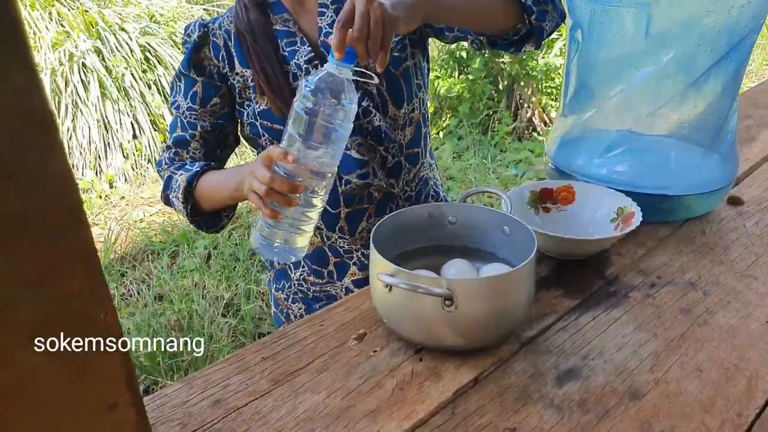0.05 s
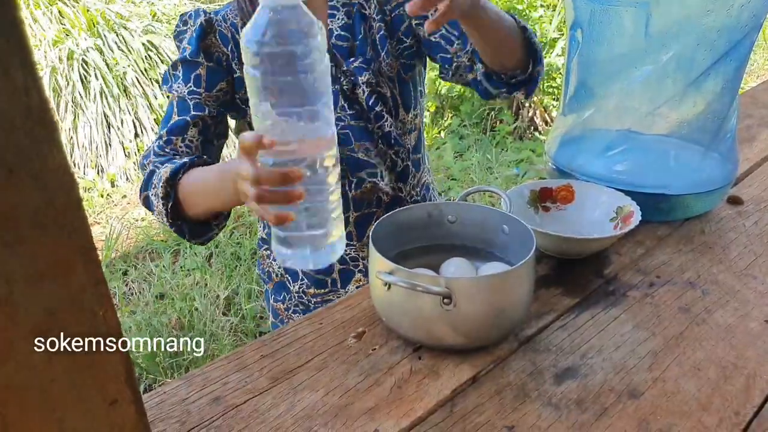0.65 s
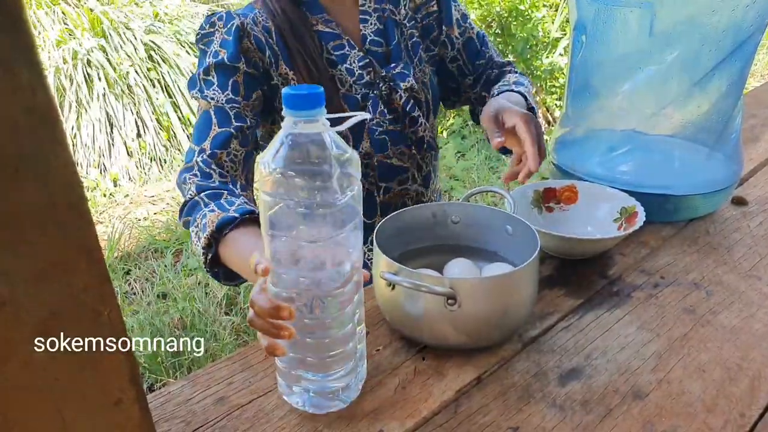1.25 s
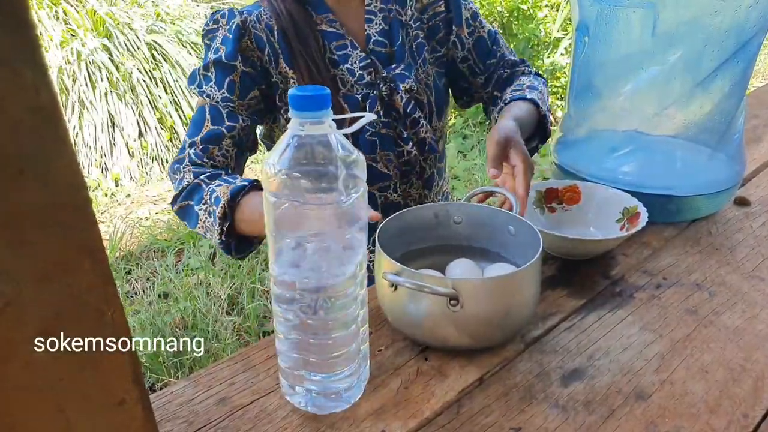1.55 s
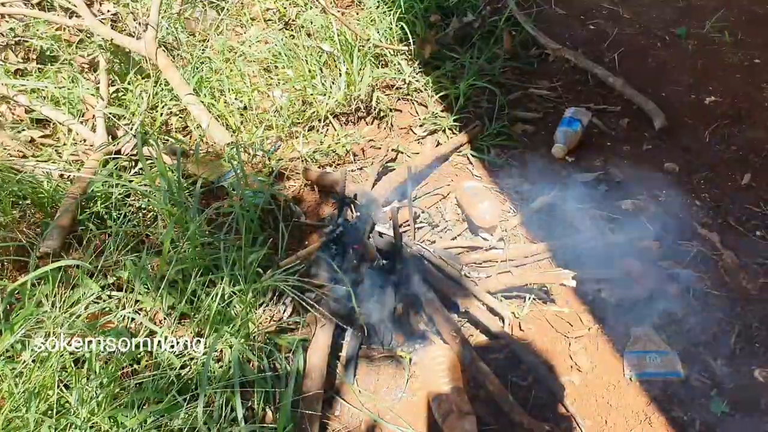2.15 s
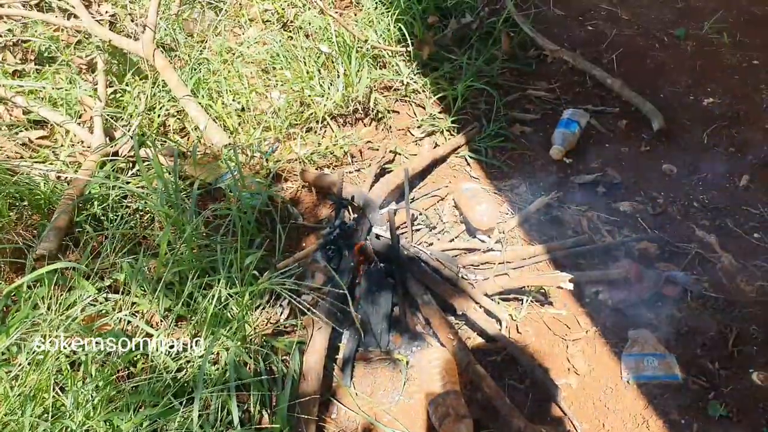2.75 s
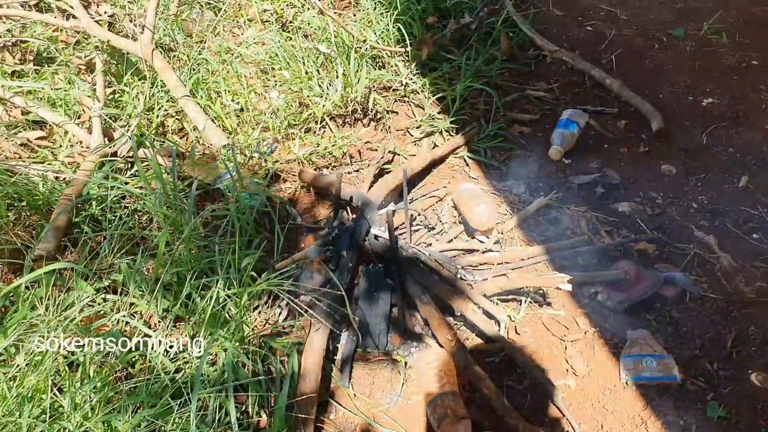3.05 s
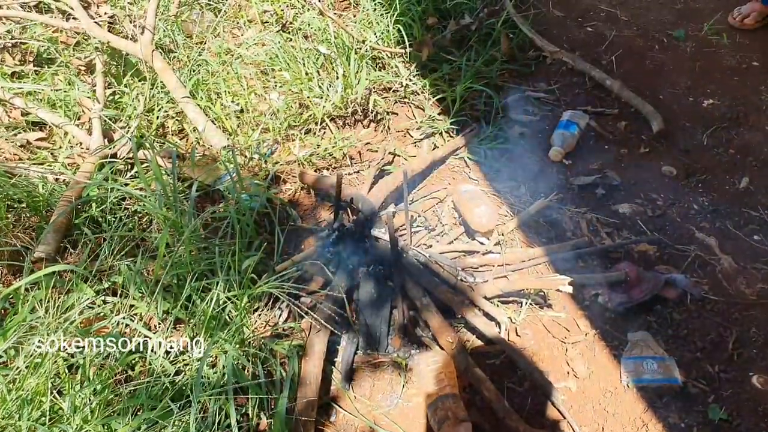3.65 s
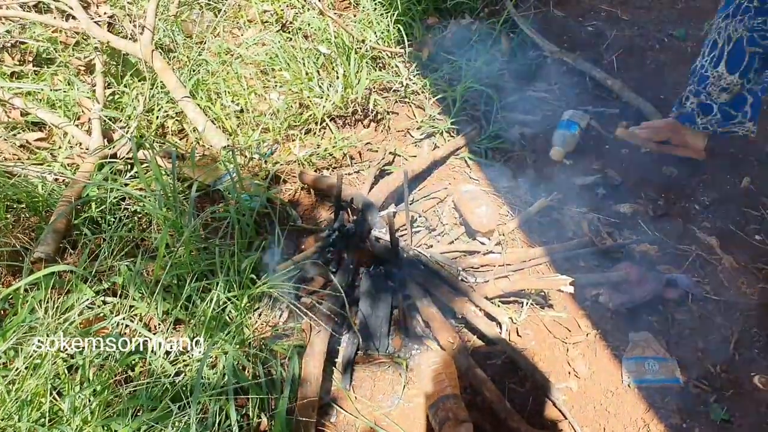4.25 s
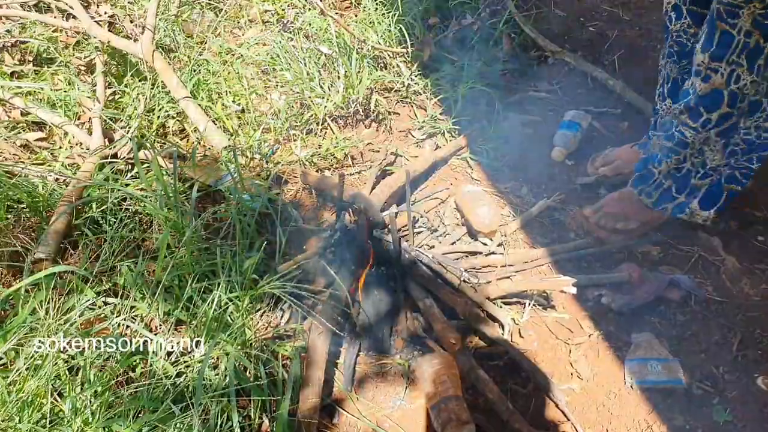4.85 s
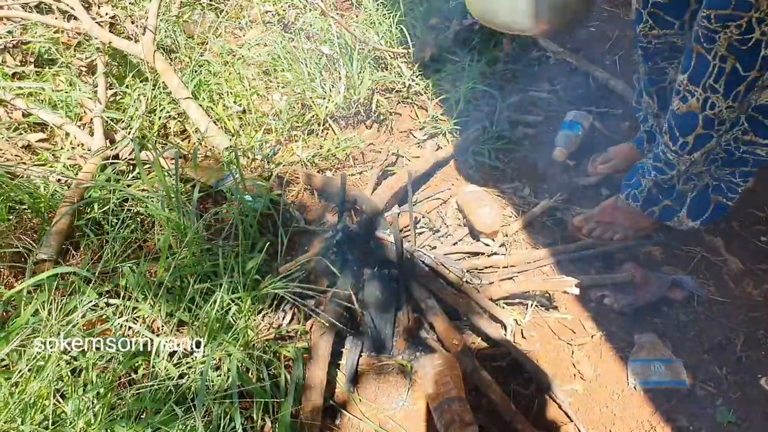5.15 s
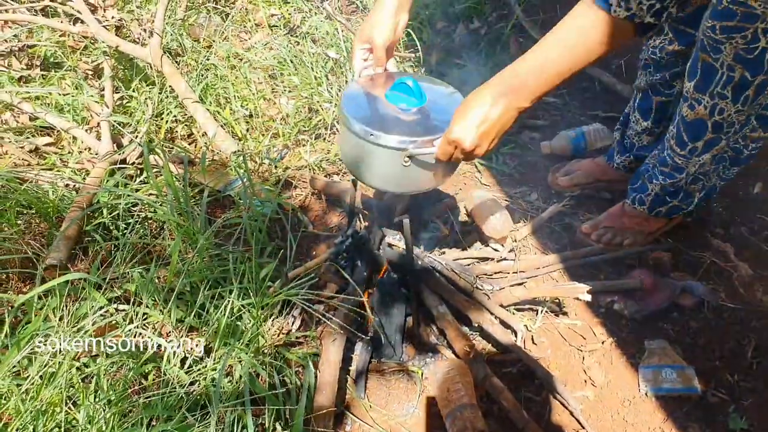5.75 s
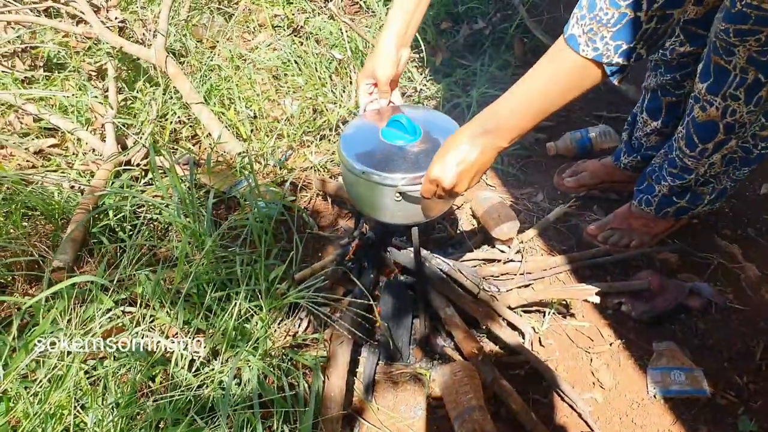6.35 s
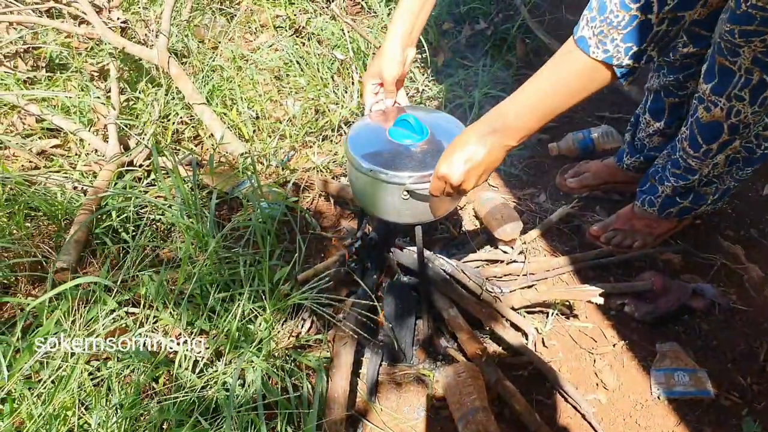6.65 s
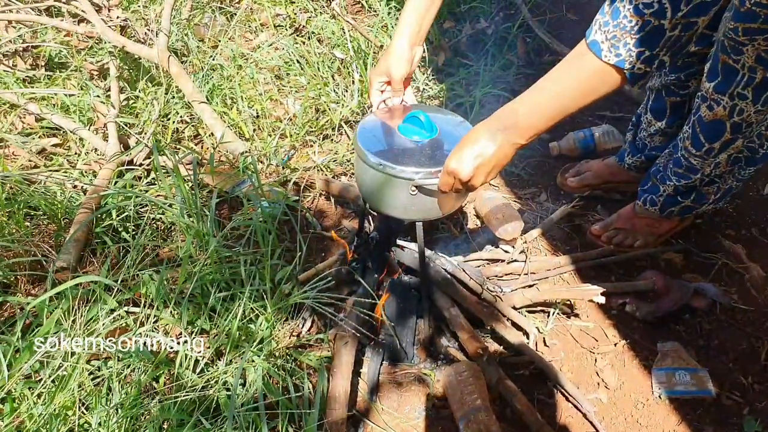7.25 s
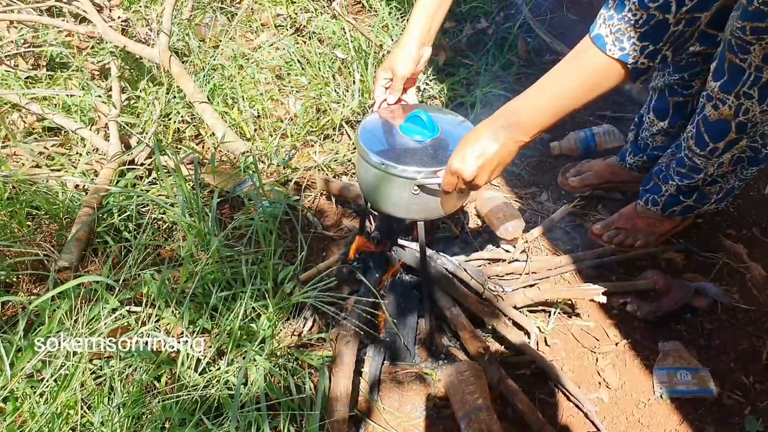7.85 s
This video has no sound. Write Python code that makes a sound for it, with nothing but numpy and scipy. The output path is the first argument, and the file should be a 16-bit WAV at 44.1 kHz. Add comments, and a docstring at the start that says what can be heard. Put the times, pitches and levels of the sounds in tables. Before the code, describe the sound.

Wind buffets the microphone as a full plastic water bottle lands on a plank table with a thud, a low boom and a slosh. A metal pot is lifted with a rasp, its loose lid rattling as it is carried. The wind dies away, and bare feet thump on earth, crushing dry leaves and snapping twigs. The pot clanks down over a small wood fire that pops and ticks, with soft rustling of cloth and grass.

```python
"""Wind buffets the microphone as a water bottle lands on a plank table with a thud, a boom and a slosh.
A metal pot is lifted with a rasp and carried to a small wood fire: bare feet thump on earth, crush
dry leaves and snap twigs, while the loose lid rattles and rings the pot, clanking hardest as it is
settled over the flames. The breeze dies down at the fire, which pops and ticks. Cloth and grass
rustle, a distant bird whistles once, and a nearby shelter adds a faint, short reverb."""
import sys
import numpy as np
from scipy import signal
from scipy.fft import rfft, irfft, next_fast_len
from scipy.io import wavfile
from scipy.ndimage import map_coordinates

SR = 44100
rng = np.random.default_rng(int(sys.argv[2]) if len(sys.argv) > 2 else 0)


def unload_wav(signal):
    """Save mono or channel-first audio to the path in sys.argv[1] as 16-bit WAV at rate SR, clipped to [-1, 1]."""
    wavfile.write(
        sys.argv[1],
        SR,
        np.round(np.clip(np.atleast_2d(signal).T, -1, 1) * 32767).astype(np.int16),
    )


N = 351918
TIME = np.arange(N) / SR
AGE = np.arange(SR // 3) / SR  # time since a hit [s]
TOP_HZ = 16400  # band limit
SNAP_LEAD_S = .00145  # room ahead of a snap's attack

# how much the cook stirs cloth and grass: (time [s], level [dB])
RUSTLE = [(0, -59.5), (1.8, -61), (2.25, -54), (2.6, -70), (3.8, -66), (4.29, -61.5), (4.7, -49.5),
          (5.3, -54.5), (5.62, -48.5), (5.75, -61), (6.03, -66.5), (7.98, -64)]


def lid(rim_db=-13, mode_spread_db=4.5, bounce_s=.009, bounce_db=-4, graze_s=.012, graze_db=-16.5):
    """The lid grazes, lands and rocks onto its other edge, ringing the pot anew at each contact."""
    # lid against pot: (time [s], level [dB], 2 kHz ring favoured by the point of contact [dB])
    contacts = [(2.024, -11.5, -2.5), (2.131, -22, -2), (2.286, -31, -1), (2.449, -33.5, -0.5),
                (2.546, -31.5, -5), (2.619, -34, 1), (2.714, -29.5, 3), (2.872, -28, -1.5),
                (2.96, -33.5, 9), (3.259, -30, 1), (3.439, -30.5, 3), (3.532, -21.5, 1.5), (3.652, -33, 0),
                (3.966, -28, 1), (4.039, -33, -4), (4.087, -34, -4), (4.205, -24, 1.5), (4.412, -31, -5),
                (4.517, -22.5, -3), (5.39, -28.5, 4), (5.817, -23.5, -0.5), (6.422, -8, 4),
                (6.84, -37.5, -3), (7.085, -19.5, -1), (7.314, -21.5, 1), (7.424, -36, -5)]
    # modes of pot and lid: (frequency [Hz], level [dB], t60 [s])
    pot_modes = [(325, -9, .1), (455, -13, .09), (540, -11, .1), (690, -9, .08), (994, -10, .07),
                 (1120, -15, .08), (1252, 1, .15), (1563, -3, .07), (1908, -2, .07), (2004, -2.5, .12),
                 (2072, -17, .24), (2191, -18, .12), (2589, -15, .13), (2678, -13.5, .15), (3425, -6, .13),
                 (3705, -20, .14), (4480, -27, .12), (6702, -27, .11), (7294, -24, .08)]
    # the rim's dense, short clatter: (frequency [Hz], level [dB])
    rim_spectrum = [(100, -17), (230, -8.5), (320, -3.5), (600, -10), (760, -4.5), (1100, -1), (2050, -5),
                    (2450, -9), (3500, -12.5), (5000, -22.5), (7200, -15), (9000, -25), (16000, -26.5)]

    def clatter():
        """One burst of rim noise."""
        return coloured(scatter(width=.57), rim_spectrum) * dying(t60=.077, rise=.00022)

    out = np.zeros((2, N))
    hz, mode_db, t60 = np.transpose(pot_modes)
    modes = np.exp(2j * np.pi * hz[:, None] * AGE) * dying(t60[:, None], rise=.0029)
    second_edge = 1 + amp(bounce_db) * np.clip((AGE - bounce_s) / .00067, 0, 1)
    for s, db, pitch_db in contacts:
        force_db = db + 25.5  # relative to a middling contact
        # each ear sees the shell's lobes from its own angle
        phase = rng.uniform(0, 2 * np.pi, len(hz)) + rng.normal(0, .25, (2, len(hz)))
        strengths = amp(mode_db + rng.normal(0, mode_spread_db, len(hz)))
        ring = ((strengths * np.exp(1j * phase)) @ modes).real * second_edge
        rim = clatter() + amp(bounce_db) * np.roll(clatter(), int(bounce_s * SR), axis=1)
        # a soft landing thuds; a hard one is bright and rings more
        thud_db = 3.5 - .27 * force_db
        bright_db = -8.5 + .29 * force_db - pitch_db / 2
        ring_db = -10 + .1163 * force_db
        touch = [(170, -11), (300, thud_db), (500, thud_db), (700, -pitch_db),
                 (950, 3), (1250, -.5), (2000, pitch_db), (3400, bright_db)]
        clank = amp(ring_db) * unit_hit(ring) + amp(rim_db) * unit_hit(rim)
        place(out, s, amp(db) * coloured(clank, touch))
        # a fast lid lands sooner after its graze
        lead_s = graze_s * amp(-.85 * max(force_db, 0))
        place(out, s - lead_s, amp(db + rim_db + graze_db) * unit_hit(clatter()))
    return out


def knocks():
    """The full bottle and the pot thud and tap, the water washes, and the planks boom under the bottle."""
    # heavy, water-filled things meeting a support: (time [s], level [dB], t60 [s])
    thuds = [(.683, -34, 0.12), (1.277, -31, 0.1), (1.352, -24.5, 0.12), (1.387, -32.5, 0.37),
             (6.423, -23.5, .045), (6.456, -34.5, 0.065)]
    # taps on bottle and pot, and the wash of water in the bottle:
    # (time [s], level [dB], centre [Hz], t60 [s])
    taps_and_wash = [(.295, -49, 2030, 0.16), (0.651, -48.5, 2500, 0.12), (.717, -37.5, 2260, 0.035),
                     (0.795, -43.5, 970, 0.079), (1.273, -26.5, 1170, 0.074), (1.371, -35, 2110, 0.3),
                     (1.632, -36, 1950, .15), (7.387, -52, 2980, 0.017)]
    out = np.zeros((2, N))
    for s, db, t60 in thuds:
        place(out, s, knock(db, hz=467, octaves=.36, rise=.0027, t60=t60))
    for s, db, hz, t60 in taps_and_wash:
        place(out, s, knock(db, hz, octaves=.61, rise=.01 * t60, t60=t60))
    plank_boom = knock(db=-23.5, hz=153, octaves=.12, rise=.048, t60=.98)
    place(out, 1.282, plank_boom)
    return out


def knock(db, hz, octaves, rise, t60, skirt_db=-32):
    """One damped, broad resonance: a decaying band of noise over a faint low skirt."""
    def resonance(f):
        hump = np.exp(-(np.log2((f + 1) / hz) / octaves) ** 2 / 2)
        return hump + amp(skirt_db) / (1 + (f / (2 * hz)) ** 2)

    return amp(db) * unit_hit(filtered(scatter(width=.49), resonance) * dying(t60, rise))


def slosh(start_s=1.37, settle_s=.057, db=-33, hz=2500, spread=.25, decay_cycles=14, count=60):
    """Water in the landed bottle slaps up and settles in a thinning burst of small bubbles."""
    bubbles = np.zeros(len(AGE))
    for when, tuning, size in rng.random((count, 3)):
        delay = -settle_s * np.log(1 - when)
        age = np.maximum(AGE - delay, 0)
        pitch = hz * (1 + spread * (2 * tuning - 1))
        strength = size * np.exp(-delay / (2 * settle_s))
        bubbles += strength * np.sin(2 * np.pi * pitch * age) * np.exp(-age * pitch / decay_cycles)
    out = np.zeros((2, N))
    place(out, start_s, amp(db) * unit_hit(bubbles))
    return out


def steps(dirt_db=-6):
    """Each footfall is a short, hollow thump with a puff of dirt."""
    # bare feet on packed earth: (time [s], level [dB], pitch [Hz], t60 [s])
    footfalls = [(4.616, -39, 334, 0.034), (4.722, -40.5, 268, 0.035), (4.781, -36.5, 272, 0.062),
                 (4.846, -27, 268, 0.085), (5.044, -31, 300, 0.024), (5.086, -36.5, 455, 0.022),
                 (5.412, -34.5, 564, 0.078), (5.515, -39.5, 570, 0.071), (5.545, -44.5, 532, 0.16)]
    dirt_spectrum = [(170, -33), (280, -3), (700, 0), (2000, -20.5), (6000, -42)]
    out = np.zeros((2, N))
    for s, db, hz, t60 in footfalls:
        thump = np.sin(2 * np.pi * hz * AGE) * dying(t60, rise=.0035)
        dirt = coloured(scatter(width=.15), dirt_spectrum) * dying(t60=.058, rise=.001)
        place(out, s, amp(db) * (unit_hit(thump) + amp(dirt_db) * unit_hit(dirt)))
    return out


def crunches(scrape_db=-5, lead_s=.1, crack_s=.0003, count=800, rise_share=.74):
    """Each short crunch is a swarm of tiny pitched cracks over a scrape, swelling and dying."""
    # a rasp as the pot is lifted, then dry leaves underfoot:
    # (time of the peak [s], level [dB], fall time [s], low-end weight [dB])
    cues = [(2.042, -30, 0.022, 16.5), (2.89, -46, 0.025, -3), (2.97, -42, 0.027, -9),
            (4.088, -30.5, 0.014, 8), (4.631, -31, 0.023, 8.5), (4.672, -24, .023, -8.5),
            (4.725, -31.5, .04, 4), (4.779, -24.5, 0.018, 10.5), (5.075, -36.5, 0.048, 9),
            (5.421, -27, 0.014, -11), (5.461, -20, 0.02, -12.5), (5.55, -36.5, 0.019, 6)]
    # tone of a crunch: (frequency [Hz], level [dB])
    crunch_spectrum = [(170, -28), (280, 3.5), (650, -2), (880, -3.5), (1850, 5.5), (3100, 7.5),
                       (4200, 0.5), (5800, -1), (7300, -3), (9000, -11), (12500, -2.5), (16000, -15)]
    out = np.zeros((2, N))
    crack_age = AGE[:160]
    for s, db, fall_s, weight_db in cues:
        when, pitch, size = rng.random((3, count, 1))
        cracks = size ** 3 * np.sin(2 * np.pi * TOP_HZ * pitch * crack_age)
        cracks *= np.exp(-crack_age / crack_s)
        positions = (when * len(AGE)).astype(int) + np.arange(len(crack_age))
        grains = np.bincount(positions.ravel(), cracks.ravel())[:len(AGE)]
        # sliding in small jerks makes the scrape gritty
        jerks_db = np.repeat(rng.uniform(-2, 2, len(AGE) // 60 + 1), 60)[:len(AGE)]
        scrape = unit(scatter(width=1) * amp(jerks_db))
        weight_eq = [(900, weight_db), (3200, .69), (5000, .017), (7000, .15), (11000, -3.5)]
        swarm = coloured(unit(grains) + amp(scrape_db) * scrape, crunch_spectrum, weight_eq)
        past_peak = AGE - lead_s
        swell = np.exp(np.minimum(past_peak / (rise_share * fall_s), -past_peak / fall_s))
        place(out, s - lead_s, amp(db) * unit(swarm) * swell)
    return out


def twigs_and_plastic():
    """Twigs break and plastic buckles with a full-bodied snap."""
    # each snap: (time [s], level [dB], body [dB], high for a thick piece)
    breaks = [(0.7174, -34, -19), (1.3964, -24.5, -7), (2.0252, -20, -5), (2.2847, -33, -12),
              (2.8796, -25.5, -11), (2.9636, -28.5, -11), (2.9796, -26, -20), (4.0389, -29, -14),
              (4.0803, -21.5, -20), (4.3987, -33.5, -18), (4.504, -28, -12), (4.6594, -14, -18),
              (4.6689, -7.5, -18.5), (4.7177, -10, -10), (4.8043, -19.5, -5), (4.814, -29, -14),
              (4.8429, -5.5, -7), (5.1185, -27, -10.5), (5.4495, -15.5, -20)]
    out = np.zeros((2, N))
    for s, db, body_db in breaks:
        shrill_db = -3.5 - .53 * body_db  # a thick piece has less bite near 7 kHz
        place(out, s - SNAP_LEAD_S, snap(db, body_db, shrill_db, top_db=-24.5, t60=.0069))
    return out


def fire_pops():
    """Burning wood lets go in thin pops, brighter the stronger they are."""
    # the fire's loud pops: (time [s], level [dB])
    pops = [(2.2167, -41), (2.3302, -33), (2.5695, -37.5), (3.466, -38.5), (4.9988, -35), (5.205, -28.5),
            (5.2846, -34.5), (5.7894, -20.5), (5.902, -26), (5.9262, -29), (5.9356, -16.5), (6.112, -26.5),
            (6.601, -38.5), (6.7623, -32), (6.8842, -25), (7.4437, -35.5), (7.5227, -29), (7.8264, -36)]
    out = np.zeros((2, N))
    for s, db in pops:
        force_db = db + 28.5  # relative to a middling pop
        pop = snap(db, body_db=-23, shrill_db=8.5, top_db=-8.5 + .77 * force_db, t60=.0053)
        place(out, s - SNAP_LEAD_S, pop)
    return out


def snap(db, body_db, shrill_db, top_db, t60, ground_db=-22, crest_db=12):
    """Dry wood lets go in about a millisecond; the ground scatters a short tail."""
    crack = scatter(width=.35) * dying(t60, rise=.0004)
    tail = amp(ground_db) * scatter(width=.8) * dying(t60=.055, rise=.001)
    burst = np.roll(crack + tail, round(SNAP_LEAD_S * SR), axis=1)
    tone = [(170, body_db + 1), (500, body_db + 18), (1000, body_db + 9), (2100, body_db + 19.5),
            (3100, 2.5), (4200, .5), (7000, shrill_db),
            (9000, top_db + 7), (12500, top_db + 14), (16000, top_db + 7.5)]
    return amp(db - crest_db) * unit_hit(coloured(burst, tone))


def embers():
    """Between its loud pops the fire ticks faintly at random."""
    crackle = ticks(per_s=20, level_db=-61.5, spread_db=1)
    return coloured(crackle, [(500, 2.6), (3000, 5.6), (7200, 19.2), (9000, 6.6), (16000, 4.3)])


def litter():
    """Bits of straw and leaf crack underfoot, as hard as the cook stirs."""
    cracks = ticks(per_s=45, level_db=curve(RUSTLE, TIME) + 5, spread_db=6)
    return coloured(cracks, [(300, -5), (1500, -32), (3000, 11), (7200, 5.5), (9000, -6), (16000, 1)])


def ticks(per_s, level_db, spread_db, tick_s=.0009, start_s=2.02):
    """Random millisecond bursts of noise around the fireplace."""
    sizes = amp(level_db + spread_db * rng.uniform(-1, 1, N))
    strikes = (rng.random(N) < per_s / SR) * (TIME > start_s) * sizes
    envelope = signal.lfilter([1], [1, -np.exp(-1 / (tick_s * SR))], strikes)
    return envelope * (rng.standard_normal(N) + .5 * rng.standard_normal((2, N)))


def rustle(flutter_db=2.5, catch_db=.8):
    """Cloth and grass brush unevenly as the cook moves."""
    # single sweeps of a sleeve or a foot: (middle [s], length [s], level [dB])
    sweeps = [(.22, 0.14, -52), (.755, 0.074, -54), (.87, .12, -56), (1.4, 0.11, -51), (1.905, 0.15, -53.5),
              (2.76, 0.09, -56.5), (2.93, 0.17, -55), (4.06, 0.12, -56), (4.41, .1, -49.5),
              (4.72, 0.19, -40), (5.87, 0.13, -46)]
    # tone of the brushing: (frequency [Hz], level [dB])
    brush_spectrum = [(200, -2.5), (400, 8), (1000, 1.5), (2800, 2), (5000, 1), (7400, 1.5), (9000, -10.5),
                      (16000, -12.5)]
    rubbing = np.hypot(amp(curve(RUSTLE, TIME)), swells(sweeps, edge=2.5))
    roughness = amp(flutter_db * wobble(70) + catch_db * wobble(15))
    return rubbing * roughness * rush(brush_spectrum, likeness=[(1000, .027)])


def wind(air_db=-56, eddy_db=15):
    """Gusts buffet each microphone port separately, over the even hiss of the garden."""
    # the breeze, dying down at the fire: (time [s], level [dB])
    breeze = [(0, -48.5), (.38, -52.5), (1.1, -37), (1.25, -37), (1.4, -32.5), (2.25, -35.5), (2.4, -50),
              (3.6, -59.5), (4.2, -78)]
    # gusts on top of it: (middle [s], length [s], level [dB])
    gusts = [(.275, 0.1, -36.5), (.575, 0.28, -26), (.745, 0.024, -28.5), (.91, 0.21, -31.5)]
    # low rumble of the buffeting: (frequency [Hz], level [dB])
    rumble_spectrum = [(20, -11), (45, -0.5), (78, 3), (100, -7), (125, -14.5), (170, -23), (240, -34),
                       (500, -89)]
    # flutter of hard gusts: (frequency [Hz], level [dB])
    eddy_spectrum = [(60, -20), (130, 8), (185, -4), (260, -13), (500, -53)]
    # the garden's hiss: (frequency [Hz], level [dB])
    air_spectrum = [(25, -11.5), (66, 0), (110, -8), (172, -15), (358, -18.5), (550, -19), (850, -22.5),
                    (2700, -24), (5200, -34), (7000, -28), (8830, -47.5), (12500, -39), (15500, -32.5),
                    (16500, -63)]
    # stereo image of that hiss: (frequency [Hz], left-right correlation [0-1])
    air_likeness = [(50, 1), (300, 0.48), (1000, 0), (4000, 0)]
    force = (amp(curve(breeze, TIME)) + swells(gusts, edge=4.5)) * amp(wobble(22))
    rumble = force * rush(rumble_spectrum, likeness=[(60, .1)])
    # small eddies grow with the square of the force: only hard gusts flutter higher up
    eddies = amp(eddy_db) * force ** 2 * rush(eddy_spectrum, likeness=[(60, .074)])
    air = amp(air_db + .33 * wobble(3.53)) * rush(air_spectrum, air_likeness)
    lean_left = amp([[1], [-1]])
    return (rumble + eddies) * lean_left + air


def bird(start_s=1.69, length_s=.24, low_hz=4050, high_hz=4750, db=-67):
    """A distant bird gives one faint, rising whistle."""
    progress = np.clip((TIME - start_s) / length_s, 0, 1)
    pitch = low_hz + (high_hz - low_hz) * progress
    waver = 1 + .012 * wobble(250)
    whistle = np.sin(2 * np.pi * np.cumsum(pitch * waver) / SR)
    return amp(db) * np.sin(np.pi * progress) ** 2 * whistle


def shelter(x):
    """A short reverb from the roof and posts nearby."""
    # decay of the reflections: (frequency [Hz], t60 [s])
    decay_times = [(200, 0.065), (2000, 0.23), (10000, 0.18)]
    hz, t, noise = signal.stft(rng.standard_normal((2, SR // 3)), SR, nperseg=256)
    decay = amp(-60 * t / along(decay_times, hz)[:, None])
    _, tail = signal.istft(noise * decay, SR, nperseg=256)
    tail = np.pad(tail / np.linalg.norm(tail[0]), ((0, 0), (SR // 200, 0)))  # 5 ms pre-delay
    return signal.fftconvolve(x, tail, axes=1)[:, :N]


def place(track, s, sound):
    """Mix a sound in at time s, with the ear delay and balance of the cook's position."""
    # where the cook is: (time [s], delay of the left ear [s], left minus right [dB])
    bearing = [(.7, -.0001, 1.5), (1.7, -.00018, 3), (2.0, .00027, -2), (3.5, .00026, -1),
               (4.8, .00021, -2.5), (5.5, .00014, -1), (6.1, -.00002, 2.2), (7.9, -.00002, 0.5)]
    times, lags, pans = np.transpose(bearing)
    lag_s, pan_db = np.interp(s, times, lags), np.interp(s, times, pans)
    ears = np.array([[.5], [-.5]])
    pair = filtered(sound * amp(ears * pan_db), lambda hz: np.exp(-2j * np.pi * hz * lag_s * ears))
    start = max(round(s * SR), 0)
    track[:, start:start + len(AGE)] += pair[:, :N - start]


def dying(t60, rise):
    """The envelope of a struck thing; both times in seconds."""
    return amp(-60 * AGE / t60) * (1 - np.exp(-AGE / rise))


def swells(rows, edge):
    """Gain of (middle [s], length [s], level [dB]) swells; edge sets how square they are."""
    return sum(amp(db) * np.exp(-np.abs(2 * (TIME - s) / length) ** edge) for s, length, db in rows)


def wobble(rate):
    """A smooth random curve, rate knots a second."""
    return map_coordinates(rng.standard_normal(int(N * rate / SR) + 4), [TIME * rate])


def scatter(width):
    """A short stereo noise; width is the gain of side against mid."""
    mid, side = rng.standard_normal((2, len(AGE)))
    return np.array([mid + width * side, mid - width * side])


def rush(spectrum, likeness):
    """Steady stereo noise of rms 1; likeness lists (frequency [Hz], left-right correlation)."""
    def mid_side_gains(hz):
        angle = np.arccos(np.clip(along(likeness, hz), -1, 1)) / 2
        return amp(along(spectrum, hz)) * [np.cos(angle), np.sin(angle)]

    mid, side = filtered(rng.standard_normal((2, N)), mid_side_gains)
    return unit(np.array([mid + side, mid - side]))


def coloured(x, *spectra):
    """x through one or more (frequency [Hz], level [dB]) EQ curves."""
    return filtered(x, lambda hz: amp(sum(along(points, hz) for points in spectra)))


def filtered(x, response):
    """x through a complex frequency response."""
    n = x.shape[-1]
    padded = next_fast_len(n + SR // 20, True)
    return irfft(rfft(x, padded) * response(np.fft.rfftfreq(padded, 1 / SR)), padded)[..., :n]


def along(points, hz):
    """(frequency [Hz], value) points read on a log axis."""
    freqs, values = np.transpose(points)
    return np.interp(np.log(hz + 1), np.log(freqs + 1), values)


def curve(rows, t):
    """(time [s], value) rows read at times t."""
    return np.interp(t, *np.transpose(rows))


def amp(db):
    """Decibels to gain."""
    return 10 ** (np.asarray(db) / 20)


def unit(x):
    """Scaled to rms 1."""
    return x / np.sqrt(np.mean(x ** 2) + 1e-20)


def unit_hit(x):
    """Scaled so that its energy equals 10 ms at rms 1."""
    energy = np.sum(np.atleast_2d(x) ** 2, axis=1).mean()
    return x / np.sqrt(energy / (SR * .01) + 1e-20)


def scene(wet_db=-19):
    """Handling, steps and fire with a touch of reverb, over rustle, wind and a bird."""
    handling = lid() + knocks() + slosh()
    near = handling + steps() + crunches() + twigs_and_plastic() + fire_pops() + embers() + litter()
    return near + amp(wet_db) * shelter(near) + rustle() + wind() + bird()


def record(dry):
    """A brick-wall low-pass at the band limit."""
    return filtered(dry, lambda hz: hz < TOP_HZ)


dry = scene()
out = record(dry)
unload_wav(out)
```